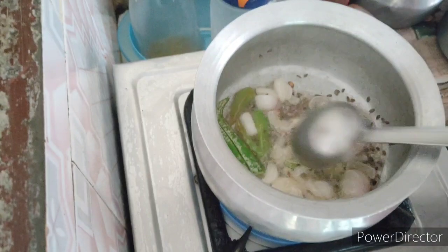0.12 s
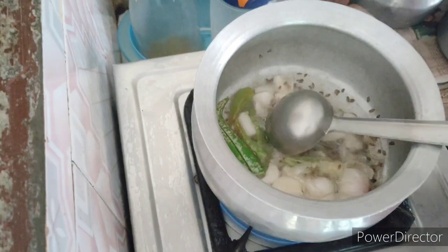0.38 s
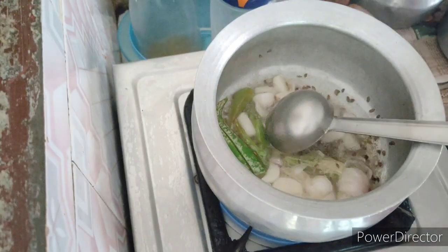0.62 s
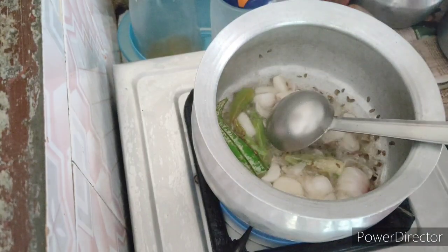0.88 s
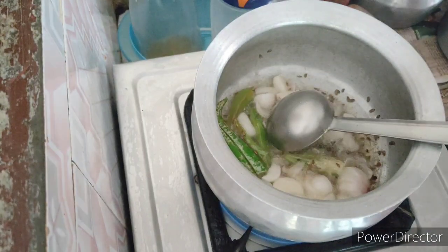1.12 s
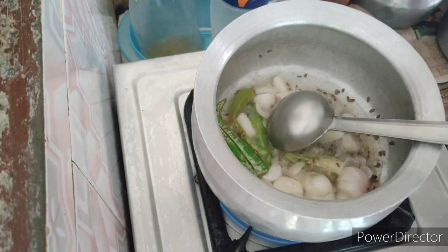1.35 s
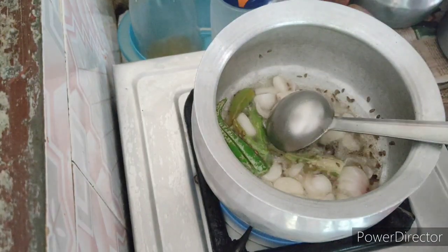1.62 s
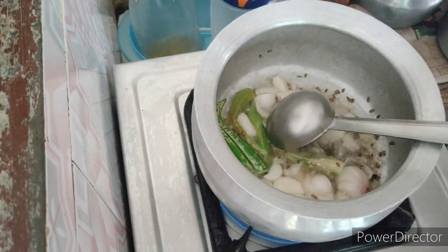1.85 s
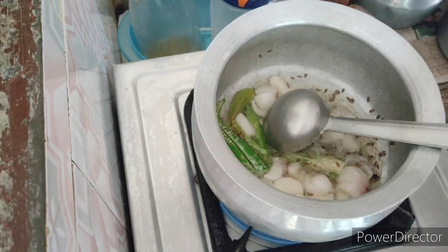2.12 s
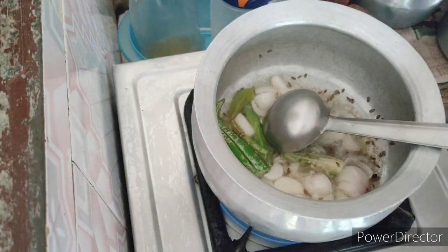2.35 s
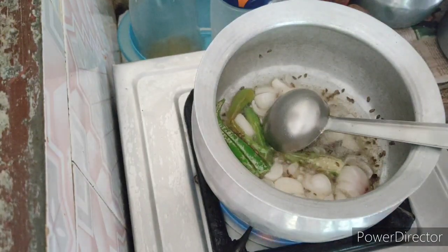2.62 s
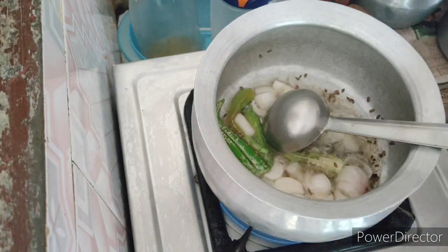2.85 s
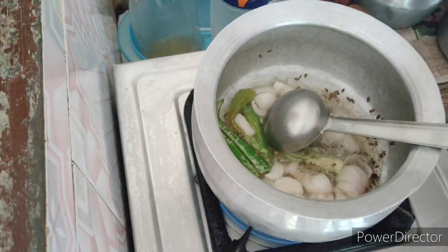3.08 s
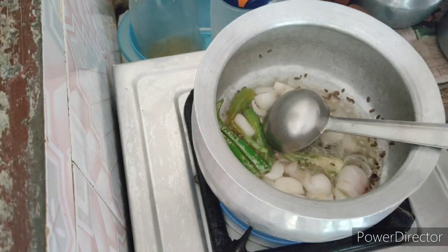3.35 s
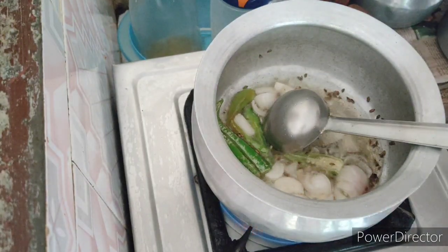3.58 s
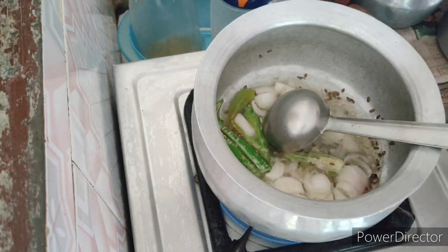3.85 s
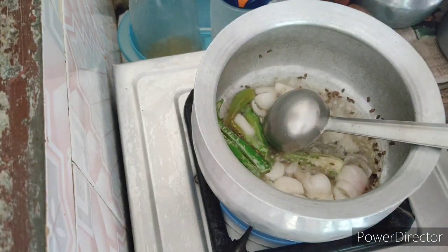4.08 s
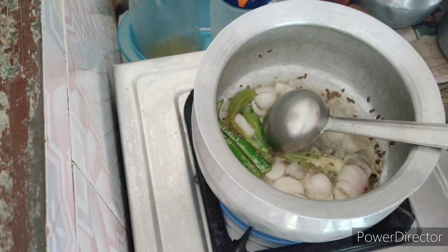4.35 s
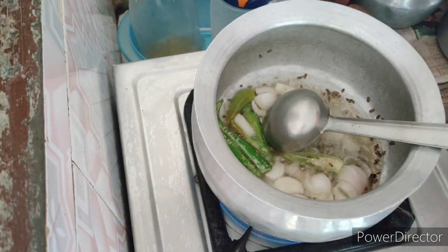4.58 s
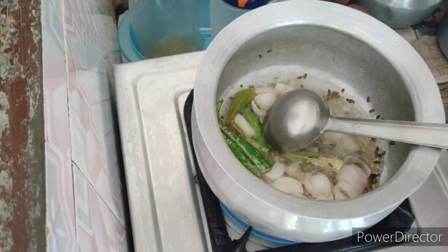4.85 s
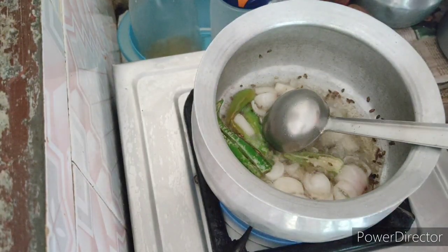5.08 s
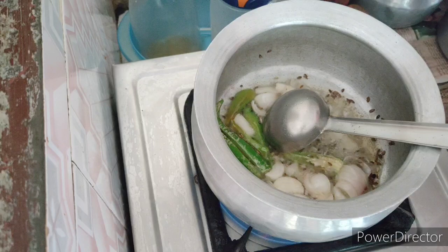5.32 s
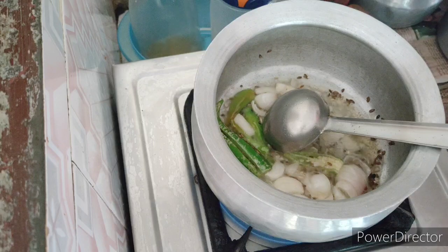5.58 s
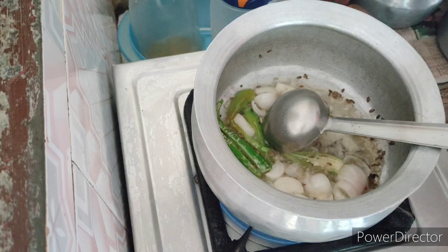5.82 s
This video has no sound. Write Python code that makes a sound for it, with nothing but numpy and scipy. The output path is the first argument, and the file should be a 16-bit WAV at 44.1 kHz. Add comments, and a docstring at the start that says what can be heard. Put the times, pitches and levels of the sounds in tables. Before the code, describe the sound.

A lively oil sizzle with sharp spits and bubbling pops slowly quiets in a metal pot; a ladle bumps its floor at the start.

```python
"""A small hard kitchen, where vegetables and seeds fry in hot oil in a thick metal pot. Random clicks and noise make
a dense fizz over bubbling, hiss and a low rumble; damped tones make sharp spits, rounder pops and singing bubbles.
The frying slowly calms. A ladle rings the pot floor at first and again late; a far engine throbs near the end.
A phone hears it in stereo: its left port faces the pot, its right port is shaded."""
import sys
import numpy as np
from scipy import signal
from scipy.fft import rfft, irfft, next_fast_len
from scipy.io import wavfile
from scipy.ndimage import map_coordinates

SR = 44100
rng = np.random.default_rng(int(sys.argv[2]) if len(sys.argv) > 2 else 0)


def generate_wav(sig):
    """Save sig (samples, or channels by samples) to the path in sys.argv[1] as 16-bit PCM at SR."""
    pcm = np.round(np.clip(np.atleast_2d(sig).T, -1, 1) * 32767).astype(np.int16)
    wavfile.write(sys.argv[1], SR, pcm)


def convert_level_to_amplitude(level_db):
    """Map a level in decibels to its linear amplitude factor."""
    exponent = np.asarray(level_db, float) / 20
    return 10 ** exponent


N = 262395


def frying():
    """Steam bursts of several sizes: fine fizz, bubbles ringing the pot and thin hiss, over a low rumble."""
    shared = crackle(per_s=2200, spread_db=3.5, clump_db=0.8, hiss=0.4)
    return fine_fizz(shared) + bubbling(shared) + steam_hiss(shared) + rumble()


# Vigour of the frying: time_s, fizz level_db
VIGOUR = [(0, -16.5), (.4, -19), (1.23, -24), (1.6, -23.5), (1.85, -23.5), (2.8, -26), (3.7, -26.5),
          (4.4, -29), (4.7, -28), (5.05, -30.5), (5.6, -30.5), (5.95, -28.5)]


def vigour_db(s):
    """The fizz level at given times, which the other frying sounds follow."""
    return np.interp(s, *np.transpose(VIGOUR))


def follow_fizz(over_db, slope, waver_db):
    """Gain of a layer: mean level over the fizz, dB per dB of vigour, and a random waver."""
    fizz_db = vigour_db(np.arange(N) / SR)
    mean_db = fizz_db.mean()
    return convert_level_to_amplitude(waver_db * wobble(7.0) + mean_db + over_db + slope * (fizz_db - mean_db))


# Fizz colour, with the port resonance near 6.5 kHz: pitch_hz, relative level_db per Hz
FIZZ_COLOUR = [(1760, -41.5), (3000, -23.5), (3290, -27.5), (4100, -16.5), (6300, -1), (6680, 1),
               (9970, -17.5), (12000, -27), (15600, -27.5), (22000, -120)]
# Pitches of the tiny bursts: pitch_hz, width_hz of each of two resonances, gain_db
DROPLET_TONES = [(5420, 1300, -6.5), (6200, 1300, 0), (6800, 430, 2.5), (7560, 350, -3)]


def fine_fizz(shared):
    """Tiny bursts excite the port resonance; sparser ticks each pass twice through a narrow resonance."""
    ticks = 0
    for mode in DROPLET_TONES:
        bursts = crackle(per_s=130, spread_db=2.5, clump_db=2.0, hiss=0.013)
        ticks = ticks + filtered(bursts, lambda hz: modes([mode])(hz) ** 2 / convert_level_to_amplitude(mode[2]))
    fine = unit(filtered(shared, causal(FIZZ_COLOUR))) + 0.54 * unit(ticks)
    return convert_level_to_amplitude(vigour_db(np.arange(N) / SR)) * fine


# Bubbling colour, before the pot's ring is added: pitch_hz, relative level_db per Hz
BUBBLING_COLOUR = [(150, -47.5), (250, -14), (682, -11), (1220, -6.5), (1390, 2.5), (1750, -2.5), (3400, 0),
                   (4150, -7.5), (5850, -30), (9900, -120)]


def bubbling(shared):
    """Sparser low bursts, partly in step with the fizz, ring the pot."""
    bursts = crackle(per_s=500, spread_db=-1, clump_db=1.0, hiss=1.0) + 0.3 * shared
    low = filtered(bursts, causal(BUBBLING_COLOUR))
    low = low + pot_ring(low)
    return follow_fizz(over_db=-9.5, slope=0.99, waver_db=0.9) * unit(low)


# Steam colour: pitch_hz, relative level_db per Hz
STEAM_COLOUR = [(4000, -120), (6500, -17), (8500, -1), (9980, -2.5), (13300, -3.5), (14900, -3),
                (15900, 2.5)]


def steam_hiss(shared):
    """Thin treble bursts of steam, slightly in step with the fizz."""
    bursts = crackle(per_s=1800, spread_db=2.5, clump_db=1.9, hiss=0.45) + 0.12 * shared
    return follow_fizz(over_db=-6.5, slope=1.05, waver_db=1.2) * unit(filtered(bursts, causal(STEAM_COLOUR)))


# Rumble colour: pitch_hz, relative level_db per Hz
RUMBLE_COLOUR = [(15, -28), (30, -17), (60, -15), (140, -11.5), (210, -1.5), (270, -12.5), (400, -19),
                 (660, -120)]
# Rumble swells, before a random waver: time_s, level_db
RUMBLE_LEVEL = [(0, -60), (.5, -49.5), (.9, -73), (1.3, -60.5), (2.03, -61), (2.1, -44.5), (2.22, -46),
                (2.3, -64), (3.3, -62.5), (4.75, -64), (4.9, -61), (5.7, -63), (5.95, -50.5)]


def rumble():
    """Low filtered noise, unrelated in its two channels, that swells and wavers."""
    noise = unit(filtered(rng.standard_normal((2, N)), causal(RUMBLE_COLOUR)))
    return noise * convert_level_to_amplitude(2.2 * wobble(5)) * convert_level_to_amplitude(curve(RUMBLE_LEVEL))


# The loudest droplets: peak_s, ring_db, ring_hz, spray_db
BIG_SPITS = [(.0635, -8, 6400, -6), (0.2053, 4, 6570, -17), (.5555, 0, 6900, -20), (0.702, 5, 6700, -1),
             (.8498, 5, 6660, -13), (1.132, -3, 6800, -22), (1.551, 1, 6730, -20), (2.2137, 2, 6880, -20),
             (2.369, 1, 6520, -20), (2.6208, -1, 6940, -20), (2.814, -1, 5800, -25),
             (3.5803, 1.5, 6540, -25), (3.7512, 0, 6470, -20), (0.133, -10, 6200, -18),
             (0.34, 12, 6100, 11.5), (.485, 5, 6650, 3.5), (0.6168, 7, 5860, -32), (0.7081, 7, 6800, 4),
             (0.812, 5, 6650, 5.5), (1.363, 1, 6800, -24), (1.41, 1, 6200, -20), (1.4674, 4.5, 5700, 3),
             (1.6875, 4, 6740, -9), (1.933, 3.5, 5940, -23), (2.105, 0, 7150, 2), (2.26, -2, 6800, -12),
             (2.817, 4.5, 6270, -25), (2.838, 5, 6860, -28), (2.888, 4.5, 6800, -27), (2.905, 1, 5800, -20),
             (2.93, 12.5, 6600, -21), (2.969, 0, 6800, -25), (3.004, -3, 6260, -25),
             (3.0153, 5.5, 6160, -2), (3.07, -2, 5370, -27), (3.0908, 1, 6100, -31),
             (3.1505, -3, 5600, -30), (3.2273, -0.5, 6800, -6), (3.233, -4, 6800, -1),
             (3.285, 3, 6200, -0.5), (3.316, 2, 5260, 1), (3.34, 2, 6950, -2), (3.356, -3, 7690, -20),
             (3.3714, -2, 6500, -4), (3.452, 0.5, 6400, -26), (3.5395, -1, 6200, -29), (3.6, 6, 7100, -14),
             (3.6574, 3, 6500, -26), (3.6988, 5, 6800, -21), (3.703, 3.5, 7640, 0), (3.7048, 6, 6530, -20),
             (3.7142, 6, 6450, -13), (3.7601, 6.5, 6600, -23), (3.839, 4, 6200, -15), (3.852, 0, 6800, -27),
             (4.135, 6.5, 6430, -31), (4.285, 3, 6800, -5), (4.385, 3, 6600, -8), (4.477, 4, 7440, -21),
             (4.5463, 2, 6700, -1), (4.6187, -4, 7100, 5), (4.664, 1, 6500, 0.5), (4.8782, 3.5, 6170, -25),
             (4.9644, 6.5, 6200, -16), (5.0173, -4, 6240, -29), (5.2401, -2, 6600, 3),
             (5.293, 2, 6200, -32), (5.3998, 4, 6560, -2), (5.4943, -10, 6740, -1.5),
             (5.743, -7, 5900, -31), (5.766, 3.5, 6460, -28), (5.865, 3, 7300, -22), (5.909, 1, 7040, -22)]


def spits():
    """A droplet flashes to steam: a click that rings the port resonance and sprays thin treble."""
    s, fizz_db, (size, pitch, wet) = scattered(count=200)
    db = fizz_db + 12.5 + 4.0 * size
    small = [s, db, 6500 * np.exp(.07 * pitch), db - 16 + 5 * wet]
    s, ring_db, hz, spray_db = np.hstack([np.transpose(BIG_SPITS), small])
    spray = rings(s, spray_db, 1.3 * hz, cycles=1.0, rise=0.021, lead=0.000032, soft=0.28)
    ring = rings(s, ring_db, hz, cycles=3.3, rise=0.0018, lead=-0.0004, soft=2.2)
    return ring + echoes(spray, t60_scale=0.2)  # the spray lands scattered


# The loudest bubbles, before pot ring and bass loss: peak_s, thud_db, tone_hz, tone_db
BIG_POPS = [(0.1302, 1, 1480, -9), (.405, -8, 1520, -12.5), (0.446, -8, 1350, -11),
            (0.6161, -2.5, 1830, -22), (1.297, -3, 1590, -11), (1.4755, 0.5, 1360, -7.5),
            (1.5691, -1, 1490, -18), (1.607, -8, 1320, -18.5), (1.7947, -7.5, 1400, -17),
            (1.877, -15, 1230, -22), (1.92, -21, 1230, -16), (1.954, -4, 1630, -7),
            (1.9724, -2.5, 1580, -15.5), (2.055, -7.5, 1260, -19), (2.0972, -3.5, 1370, -10.5),
            (2.1407, -4.5, 1580, -12.5), (2.4438, -7, 1490, -16), (2.4874, -2, 1720, -7.5),
            (2.5648, 8.5, 1130, -7), (2.978, -7, 1520, -18), (3.0349, -9.5, 1480, -17.5),
            (3.1494, -22, 1180, -20), (3.285, -19, 1430, -19), (3.577, -2, 1220, -26),
            (3.5997, 4, 1120, -46), (3.608, -23, 1560, -21), (3.677, -28, 2620, -16),
            (3.7035, 4, 1950, -17), (3.8436, 3, 1530, -16), (3.965, -16, 1310, -34),
            (4.1337, -7, 1400, -21), (4.5136, -3, 1600, -30), (5.1647, -4.5, 1270, -21),
            (5.3997, -3.5, 1360, -14.5), (5.435, -17, 1640, -13), (5.875, -7, 1470, -16.5)]
# Bubble skins that tear with a hard crack: time_s, level_db, pitch_hz
SKIN_CRACKS = [(.4457, -4, 3000), (2.0972, -5, 2200), (2.1404, -13, 2400), (2.5638, -4, 2180),
               (3.7030, -3, 2800), (3.7042, -9, 2800), (5.3995, -12, 2800)]


def pops():
    """A larger bubble bursts: one low push, a short tone and a snap of its skin, carried on by the pot."""
    s, fizz_db, (push, pitch, size) = scattered(count=20)
    db = fizz_db - 4
    small = [s, db + 3 * push, 1700 * np.exp(.14 * pitch), db + 3 * size]
    s, thud_db, hz, tone_db = np.hstack([np.transpose(BIG_POPS), small])
    thud_hz = 690 * (hz / 1500) ** 0.5  # a deeper tone goes with a deeper push
    thud = rings(s, thud_db, thud_hz, cycles=0.24, rise=0.0057, lead=-0.00085)
    tone = rings(s, tone_db, hz, cycles=1.4, rise=0.0053, lead=-0.00069)
    snap = rings(s, tone_db - 1.5, 3100 + 0 * hz, cycles=0.55, rise=0.0033, lead=-0.0005)
    burst = thud + tone + snap
    burst = burst + 0.59 * pot_ring(burst)
    cracks = rings(*np.transpose(SKIN_CRACKS), cycles=1.0, rise=0, lead=-0.000041, soft=0.2)
    return shed_bass(burst + cracks, 220)  # a small bubble radiates no deep bass


# Small bubbles that only sing, without a push: peak_s, pitch_hz, level_db
SINGING_BUBBLES = [(2.0985, 2120, -12.5), (2.1005, 2220, -12), (2.622, 1500, -23), (2.639, 2200, -19),
                   (3.708, 1410, -15.5), (3.9879, 2120, -14), (4.206, 2600, -21), (4.3345, 2120, -10.5),
                   (4.604, 2220, -14.5), (4.7296, 1380, -17.5), (4.8938, 2120, -22), (5.05, 2080, -19.5)]


def pings():
    """A small bubble rings for a few cycles at its own pitch."""
    s, hz, db = np.transpose(SINGING_BUBBLES)
    return rings(s, db, hz, cycles=3.2, rise=0.002, lead=-0.0008, soft=0.5)


# Air and wall of the pot: pitch_hz, width_hz, gain_db
POT_MODES = [(501, 260, 3.5), (716, 25, 6.5), (1048, 62, 5.5), (1456, 24, -3.5), (1580, 33, 1),
             (2120, 123, -0.5)]


def pot_ring(x):
    """The resonances of the pot's air and wall, driven by x."""
    return filtered(x, modes(POT_MODES))


# Knocks of the ladle on the pot: time_s, deep modes_db, upper modes_db, clink_db
KNOCKS = [(.004, -11.5, -17.5, -35), (.054, -19, -37, -38), (.264, -42, -37, -18), (0.269, -16, -29, -18),
          (0.288, -22, -30, -35), (0.303, -15, -28, -24), (.322, -13.5, -22.5, -27), (.333, -27, -19, -35),
          (0.465, -24.5, -48, -45), (4.775, -44, -43, -55), (4.874, -35, -39, -31), (4.881, -56, -32, -42),
          (4.891, -44, -31.5, -40), (4.897, -48, -34, -33), (4.904, -55, -48, -45)]
# Drags over the floor: start_s, length_s, deep modes_db, upper modes_db
LADLE_DRAGS = [(0.029, 0.051, -22, -27), (0.343, 0.029, -47, -36), (0.402, 0.09, -28, -32.5),
               (0.617, 0.059, -32, -55)]
# Resonances of the pot floor: pitch_hz, level_db, decay in cycles
FLOOR_MODES = [(112, -5, 0.97), (229, -8, 3.2), (280, 1, 3.8), (340, -9, 3), (460, 1, 3.5),
               (605, -2.5, 6.5), (720, -6, 5), (830, -3, 6), (1370, -4, 6), (1600, -5, 6), (2250, 0, 7),
               (3200, 0, 8), (4250, -2, 9)]


def ladle():
    """Each bump of the steel bowl rings the pot floor, its modes at new strengths."""
    drags = [skips(*drag, count=8) for drag in LADLE_DRAGS]
    s, deep_db, upper_db, clink_db = np.hstack([np.transpose(KNOCKS)] + drags)
    vary_db = rng.normal(0, 2, (len(s), len(FLOOR_MODES)))
    knocks = 0
    for k, (hz, db, cycles) in enumerate(FLOOR_MODES):
        blow_db = deep_db if hz < 400 else upper_db if hz < 1000 else clink_db
        blow_db = blow_db + db + vary_db[:, k]
        knocks = knocks + rings(s, blow_db, hz + 0 * s, cycles, rise=0, lead=-0.7 / hz, soft=0.64)
    return shed_bass(knocks, 190)  # the pot is too small to radiate deep bass


def skips(start, length, deep_db, upper_db, count):
    """The bumps of one drag: uneven steps that fade, then plunge in level once the ladle rests."""
    jitter, size = rng.standard_normal((2, count))
    t = np.arange(count) * 0.021  # s between bumps
    fade_db = -7 * t / length - 200 * np.maximum(t / length - 1, 0) + 3 * size
    return [start + t + 0.00264 * jitter, deep_db + fade_db, upper_db + fade_db, upper_db - 6 + fade_db]


# Far engine: time_s, level_db
ENGINE_LEVEL = [(5.1, -84), (5.17, -58), (5.35, -55), (5.54, -51), (5.75, -58), (5.84, -57), (5.95, -60)]


def engine():
    """About twenty steady firings a second through an exhaust that sings near 110 Hz."""
    firings_hz, start_phase = 19.9, 0.302  # phase in cycles
    firings = np.diff(np.floor(np.arange(N) * firings_hz / SR + start_phase), prepend=0)
    uneven = firings * convert_level_to_amplitude(0.8 * wobble(30)) + .005 * rng.standard_normal(N)
    exhaust = modes([(111, 40, 0), (40, 16, -8), (160, 20, -8)])
    return unit(filtered(uneven, lambda hz: exhaust(hz) ** 2)) * convert_level_to_amplitude(curve(ENGINE_LEVEL))


# Decay of the kitchen, before t60_scale: pitch_hz, t60_s
KITCHEN_DECAY = [(300, 0.86), (2000, 0.56), (7000, 0.13), (14000, 0.013)]


def echoes(x, t60_scale):
    """A fresh noise tail for every .3 s of sound; each frequency dies at its own speed."""
    step, out = round(.3 * SR), np.zeros(N + 2 * SR)
    for a in range(0, N, step):
        hz, t, z = signal.stft(rng.standard_normal(SR // 4), SR, nperseg=128)
        t60 = t60_scale * along(KITCHEN_DECAY, hz)[:, None]
        tail = signal.istft(z * convert_level_to_amplitude(-60 * t / t60), SR, nperseg=128)[1]
        wet = signal.fftconvolve(x[a:a + step], tail / np.linalg.norm(tail))
        out[a:a + len(wet)] += wet
    return out[:N]


def crackle(per_s, spread_db, clump_db, hiss):
    """Random steam bursts of varied size, clumped in time, over smooth noise: the direct sound and an unrelated
    reflected twin that shares the moments but not the phases."""
    draw = rng.random((4, N))
    size_db = np.minimum(-spread_db * np.log(draw[0] + 1e-9), 15)
    size = convert_level_to_amplitude(size_db) * (draw[1] < per_s / SR)
    clicks = unit(size * np.sign(draw[2:] - .5))
    clumps = wobble(90) + wobble(35) + 0.3 * wobble(12)
    fade = np.exp(-1 / (.002 * SR))  # each burst trails a dying hiss; its power decays over 2 ms
    sputter = unit(np.sqrt(signal.lfilter([1], [1, -fade], size ** 2)))
    noise = (hiss + .4 * sputter) * rng.standard_normal((2, N))
    return unit((clicks + noise) * convert_level_to_amplitude(clump_db * clumps))


def rings(times, peak_db, hz, cycles, rise, lead, soft=0.42):
    """Damped tones that swell over soft cycles, pitch climbing as the cavity closes; lead = s from peak to start."""
    out = np.zeros(N + SR)
    for s, db, f in zip(times, peak_db, hz):
        turns = f * np.arange(round(10 * cycles / f * SR)) / SR
        swell = 1 - np.exp(-(turns / soft) ** 2)
        tone = np.sin(2 * np.pi * (turns + rise * turns ** 2 / 2)) * np.exp(-turns / cycles) * swell
        out[max(round((s + lead) * SR), 0):][:len(turns)] += convert_level_to_amplitude(db) * tone
    return out[:N]


def scattered(count):
    """Random moments, the fizz level there (capped at -23 dB), and three normal draws for each."""
    draw = rng.standard_normal((count, 3))
    s = rng.random(count) * N / SR
    return s, np.minimum(vigour_db(s), -23), draw.T


def unit(x):
    """Scaled to rms 1."""
    return x / np.sqrt(np.mean(x ** 2) + 1e-20)


def along(points, hz):
    """Value at hz of (Hz, value) points on a log axis."""
    f, v = np.transpose(points)
    return np.interp(np.log(hz + 1), np.log(f + 1), v)


def curve(points):
    """One value per sample from (s, value) points."""
    return np.interp(np.arange(N) / SR, *np.transpose(points))


def wobble(rate):
    """A smooth random curve, rate knots a second."""
    return map_coordinates(rng.standard_normal(400 + N // 100), [np.arange(N) * min(rate, 400) / SR])


def filtered(x, response):
    """x times a complex response of frequency."""
    m = next_fast_len(N + SR // 2)
    return irfft(rfft(x, m) * response(np.fft.rfftfreq(m, 1 / SR)), m)[..., :N]


def causal(spectrum):
    """Minimum-phase response of (Hz, dB) points, so that clicks keep a sharp front."""
    def response(hz):
        c = irfft(np.log(np.maximum(convert_level_to_amplitude(along(spectrum, hz)), 1e-6)))
        c[1:len(c) // 2] *= 2
        c[len(c) // 2 + 1:] = 0
        return np.exp(rfft(c))
    return response


def modes(table):
    """Sum of causal resonances (Hz, width Hz, dB)."""
    return lambda f: sum(convert_level_to_amplitude(db) * 1j * f * w / (c * c - f * f + 1j * f * w) for c, w, db in table)


def shed_bass(x, corner_hz):
    """Second-order bass loss of a small radiator below corner_hz."""
    return filtered(x, lambda f: (1j * f / corner_hz / (1 + 1j * f / corner_hz)) ** 2)


# What the ports share: pitch_hz, left-right likeness (0 to 1)
PORT_LIKENESS = [(60, .75), (110, .85), (250, .95), (600, .86), (1200, .3), (1900, .14), (15000, .07)]
# Tilt of the shaded port: pitch_hz, cut of the right_db
RIGHT_CUT = [(60, 2), (250, 5), (800, -2.5), (1800, 1.5), (2800, 1), (4200, 7.5), (6500, 7.5), (10000, 16),
             (15000, 12.5)]


def scene():
    """The facing port hears the pot directly; the shaded one shares the bass, gets pops and knocks a little later
    and the treble by reflections."""
    spitting, thumps = spits(), pops() + pings() + ladle()
    sharp = spitting + thumps
    direct, twin = frying() + engine()
    left = direct + sharp + convert_level_to_amplitude(-11) * echoes(sharp, t60_scale=0.4)

    detour_s = 0.0001  # extra path around the phone
    around = filtered(thumps, lambda hz: np.exp(-2j * np.pi * hz * detour_s))
    shaded = twin + echoes(spitting, t60_scale=0.076) + convert_level_to_amplitude(-2.5) * around
    shaded = shaded + convert_level_to_amplitude(-10) * echoes(sharp, t60_scale=0.6)

    lead_s = 4.5e-5  # the facing port hears the pot first
    alike = lambda hz: np.clip(along(PORT_LIKENESS, hz), 0, 1)
    common = filtered(left, lambda hz: alike(hz) * np.exp(-2j * np.pi * hz * lead_s))
    right = common + filtered(shaded, lambda hz: np.sqrt(1 - alike(hz) ** 2))
    return np.array([left, filtered(right, lambda hz: convert_level_to_amplitude(-along(RIGHT_CUT, hz)))])


def roll_off(x):
    """The treble ends steeply here."""
    return signal.sosfilt(signal.butter(12, 16070, fs=SR, output="sos"), x)


def record(dry):
    """The loudest peaks round off just under full scale; then the phone's band limit."""
    top = .85  # ceiling of the rounding
    rounded = dry / (1 + np.abs(dry / top) ** 6) ** (1 / 6)
    mix = filtered(rounded, lambda hz: hz < 15800)
    return roll_off(mix)


dry = scene()
out = record(dry)
generate_wav(out)
```